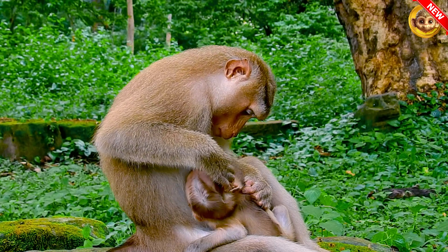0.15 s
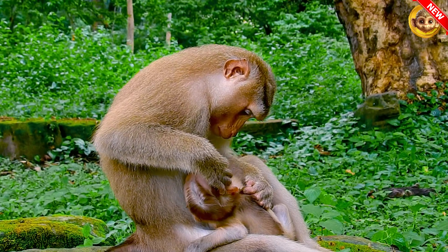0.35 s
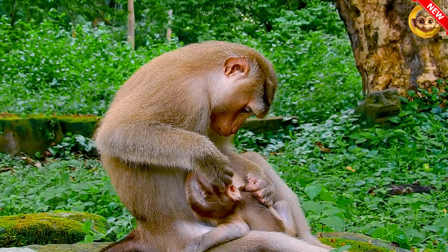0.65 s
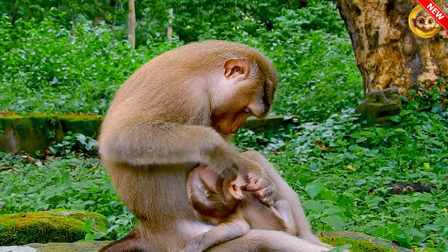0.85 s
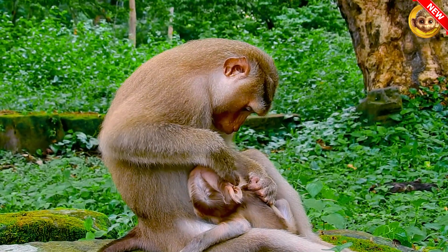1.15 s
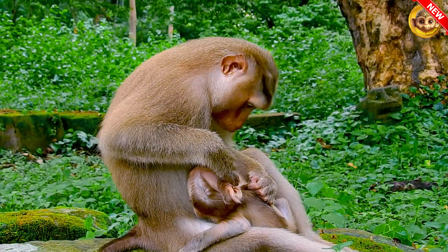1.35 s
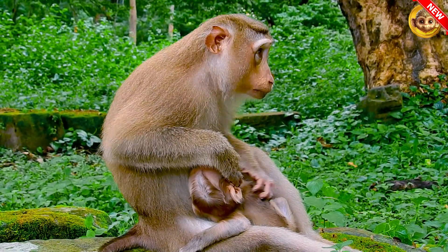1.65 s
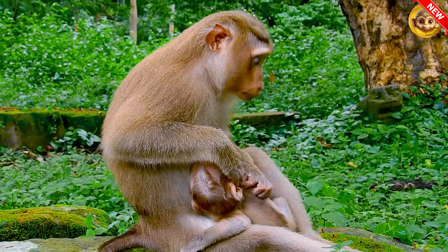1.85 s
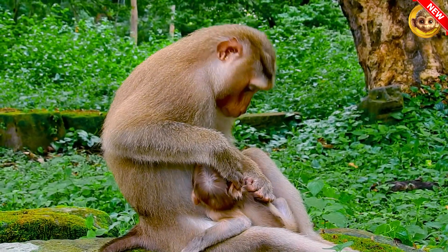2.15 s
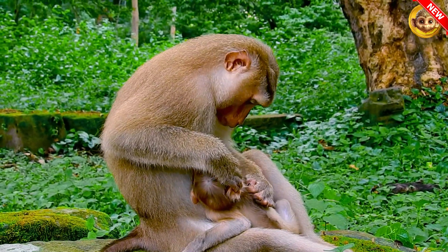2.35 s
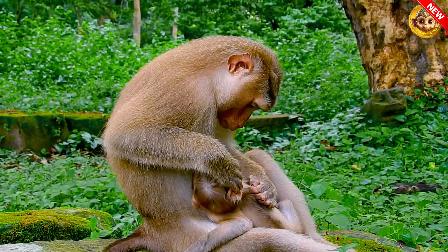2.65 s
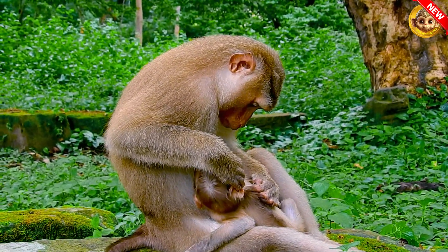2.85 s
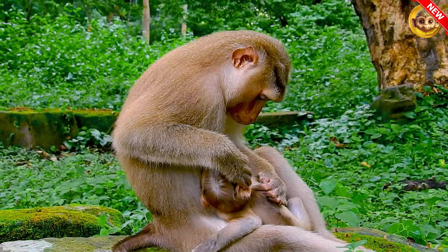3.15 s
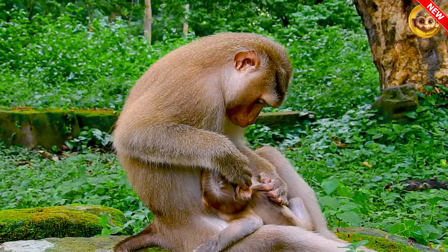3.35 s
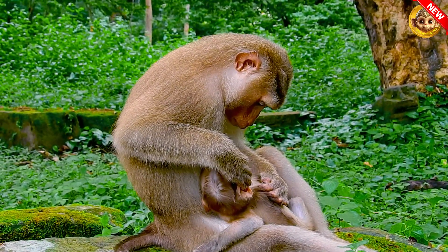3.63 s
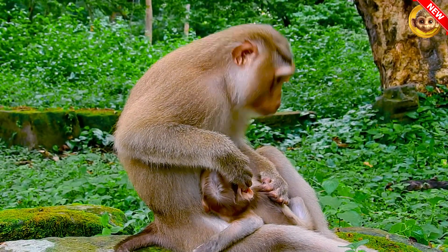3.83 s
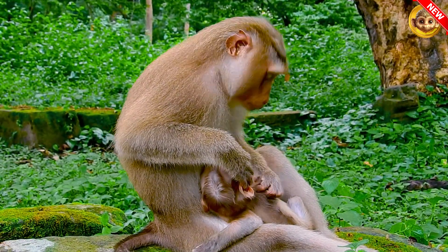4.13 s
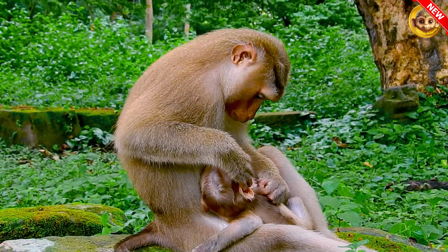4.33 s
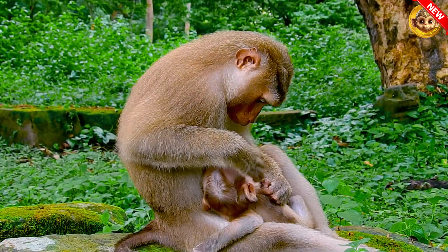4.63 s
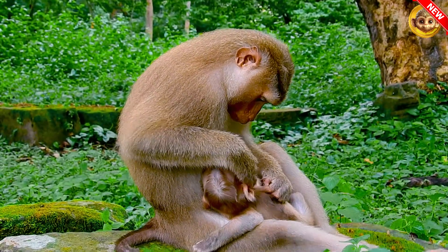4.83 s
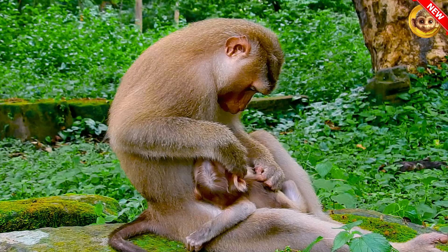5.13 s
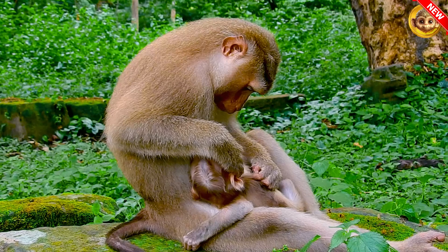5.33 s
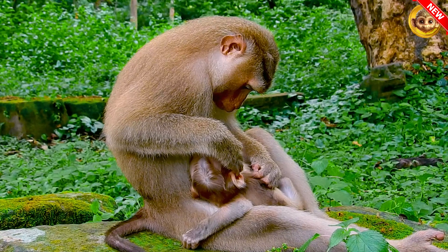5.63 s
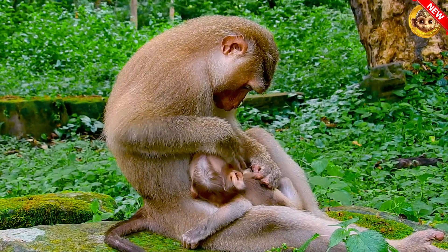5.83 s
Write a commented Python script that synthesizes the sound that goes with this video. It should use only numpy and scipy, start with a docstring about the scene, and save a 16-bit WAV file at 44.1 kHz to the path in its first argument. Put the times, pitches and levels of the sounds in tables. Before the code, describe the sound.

A quiet forest bed runs throughout: a far low hum, easing slightly after 3 s, soft leaf hiss and two faint, wavering high insect bands. At 0 s the end of a hooked bird chirp echoes away, with soft dull thuds until about 0.9 s. A faint scrape comes at 1.2 s, a weak peep at 1.6 s and a rustle at 1.7 s. A clear chirp jumps up and slides down at 1.95 s, with a small knock at 2.1 s. Hoarse, layered bird calls follow at 2.4 and 3.2 s, the second stronger, around sharp ticks and a scrape at 3.0 s and a thin squeak. Rustles come at 3.6 and 3.8 s, a faint squeak and long high whistle near 4 s. Pure whistles fall fast at 4.45 and 5.45 s, a fainter one at 5.16 s, while another long whistle slides down from 4.8 to 5.8 s. A faint squeak precedes a duller chirp at 5.8 s. Tree echoes blur the birds.

```python
"""Over a far low hum, leaf hiss and two insect bands, the end of a hooked bird chirp is followed by soft thuds.
A scrape, a peep, a second hooked chirp and ticks lead to hoarse double calls, then squeaks and falling whistles.
Sliding whistles, long and short, run on among more small ground noises, until a last, duller hooked chirp.
Bird notes are sine partials on a gliding pitch, smeared by noise echoes from the trees; the rest is
mostly shaped noise, with ringing sines for the ticks."""
import sys
import numpy as np
from scipy import signal
from scipy.fft import rfft, irfft
from scipy.io import wavfile
from scipy.ndimage import uniform_filter1d

SR = 44100
rng = np.random.default_rng(int(sys.argv[2]) if len(sys.argv) > 2 else 0)


def nominal_scale(level):
    """Amplitude ratio for a level in decibels (scalar or array-like)."""
    x = np.asarray(level, float) / 20
    return 10 ** x


def transcribe(signal):
    """Save signal, clipped to [-1, 1], as a 16-bit WAV file at the path in sys.argv[1]."""
    frames = np.atleast_2d(signal).T
    limited = np.clip(frames, -1, 1)
    pcm = np.round(limited * 32767).astype(np.int16)
    wavfile.write(sys.argv[1], SR, pcm)


N = 263718  # samples in the scene
LEAD = SR // 4  # samples of run-up, for a note already sounding at the start
TAIL = 40960  # samples in an echo


def read(table, hz, column=1):
    """Straight lines on a log-frequency axis."""
    table = np.array(table)
    return np.interp(np.log(hz + 1), np.log(table[:, 0]), table[:, column])


def level(x, db):
    """Scale to an rms level."""
    return x * nominal_scale(db) / np.sqrt(np.mean(x ** 2))


def bump(hz, centre_hz, width_hz, db):
    """A bell-shaped rise or dip in dB."""
    return db * np.exp(-2 * ((hz - centre_hz) / width_hz) ** 2)


def pair(size, db_of, likeness):
    """Coloured noise at two microphones, partly alike."""
    hz = np.fft.rfftfreq(size, 1 / SR)
    alike = np.clip(read(likeness, hz), -1, 1)
    shares = np.sqrt([(1 + alike) / 2, (1 - alike) / 2])
    mid, side = rfft(rng.standard_normal((2, size))) * shares
    return irfft(np.array([mid + side, mid - side]) * nominal_scale(db_of(hz)), size)


def walk(rate):
    """Random levels held 1 / rate s and slewed twice; spread near 1."""
    k = int(SR / rate)
    steps = np.repeat(rng.standard_normal(N // k + 1), k)
    return 1.78 * uniform_filter1d(uniform_filter1d(steps, k), k)[:N]


def fine(rows, start=0, slowness=1):
    """Fill in a hand-drawn note with 96 points of time, pitch and level."""
    s, pitch, db = np.transpose(rows)
    t = np.linspace(s[0], s[-1], num=96)
    return start + slowness * t, np.interp(t, s, pitch), np.interp(t, s, db)


def short_note(start, length, from_hz, to_hz, db, attack, release, sag_db):
    """Attack, sagging hold, release, on a glide that slows down."""
    edge_db, haste = -13.5, 1.8  # level where a note starts and ends; how early the glide happens
    u = np.linspace(0, 1, num=24)
    glide = (1 - np.exp(-haste * u)) / (1 - np.exp(-haste))
    shape_db = np.interp(u, [0, attack, 1 - release, 1], [edge_db, 0, -sag_db, edge_db - sag_db])
    return start + length * u, from_hz + (to_hz - from_hz) * glide, db + shape_db


# A PERCH, below, has these columns: echo level/dB, left minus right/dB, share blurred by nearby leaves 0-1,
# breath flutter/dB, pitch warble (share of pitch), extra damping of the tail/dB per s.

# one hooked chirp shape: t/s after start (before slowing), f/Hz, level/dB
HOOK_SHAPE = [(0, 3550, -12), (.009, 4128, 1.5), (.021, 3290, 4), (.04, 2890, -2), (.07, 2635, -4.5),
              (.108, 2407, -5), (.145, 2250, -1.5), (.18, 2200, -16)]
# its calls: start t/s, level/dB, slowness, blur 0-1, overtones level/dB
HOOK_CALLS = [(-.145, -41.5, 0.99, .3, 1.5), (1.952, -42, 0.98, .08, -1.5), (5.814, -35.5, .85, .6, -4)]
# how its 2nd partial passes: f/Hz, level/dB
HOOK_OCTAVE = [(4400, -40), (4850, -25), (5250, -20), (5800, -34), (8300, -46)]
# how its 3rd partial passes: f/Hz, level/dB
HOOK_TWELFTH = [(6700, -28), (7200, -19), (7850, -18), (8700, -28), (10000, -42)]
# PERCH columns, but without the blur, which comes from the call
HOOK_PERCH = (-0.5, 0.2, 0.84, 0.0139, 3.5)


def hooked_chirps():
    """The pitch jumps up and slides down; leaf cover dulls the higher part of a blurred call."""
    leaf_shade_db = -18  # per octave of pitch, behind full leaf cover
    echo_db, pan_db, *voice = HOOK_PERCH
    for start, call_db, slowness, blur, bright_db in HOOK_CALLS:
        s, pitch, db = fine(HOOK_SHAPE, start, slowness)
        octave = read(HOOK_OCTAVE, 2 * pitch) + bright_db
        twelfth = read(HOOK_TWELFTH, 3 * pitch) + bright_db
        db = db + call_db + leaf_shade_db * blur * np.log2(pitch / 2600)
        yield s, pitch, db, [0, octave, twelfth], (echo_db, pan_db, blur, *voice)


# falling whistles: start t/s, starting f/Hz, fall/octaves per s, level/dB, lean to the high part/dB per octave
FALL_CALLS = [(3.191, 2900, 6.7, -56, 3), (4.447, 3086, 7.5, -39.5, -1.5), (5.159, 2954, 7.3, -55, 1.5),
              (5.45, 3088, 7.66, -39, 3.5)]
# loudness along the fall: pitch f/Hz, level/dB
FALL_LOUDNESS = [(850, -45), (1000, -25), (1170, -25), (1440, -16), (1720, .5), (1980, -5), (2380, -2.5),
                 (2700, -14), (3100, -27)]
# PERCH columns; echo and blur are for a near call
FALL_PERCH = (-7, -0.6, .42, 3, .0045, 9)


def falling_whistles():
    """One pure partial drops at a steady number of octaves per second."""
    near_db, end_hz = -39, 860
    echo_per_db, blur_per_db = 0.5, 0.025
    echo_db, pan_db, blur, *voice = FALL_PERCH
    for start, from_hz, octaves, call_db, lean_db in FALL_CALLS:
        t = np.linspace(0, np.log2(from_hz / end_hz) / octaves, num=96)
        pitch = from_hz * 2 ** (-octaves * t)
        # fainter calls are further off: wetter, more blurred
        far_db = max(near_db - call_db, 0)
        perch = (echo_db + echo_per_db * far_db, pan_db, blur + blur_per_db * far_db, *voice)
        db = call_db + read(FALL_LOUDNESS, pitch) + lean_db * np.log2(pitch / 1900)
        yield start + t, pitch, db, [0], perch


# arched voice of the hoarse call: t/s after start, f/Hz, level/dB
ARCH_SHAPE = [(0, 1970, -15), (.04, 2310, -11), (.075, 2880, -6), (.11, 3170, -6), (.18, 3040, -10),
              (.25, 2830, -11), (.3, 2710, -10), (.325, 2520, -6), (.343, 2270, -5), (.355, 2140, -17)]
# its calls: start t/s, level/dB, late entry t/s, brightness/dB per octave, swell/dB per s
ARCH_CALLS = [(2.412, -58, .003, -8, -16), (3.195, -50, 0.053, 2, 14)]
# how its throat passes every partial: f/Hz, level/dB
ARCH_THROAT = [(1900, -45), (2700, -24), (3050, -3), (3300, -8), (4000, 4), (5500, 0), (6400, -3),
               (7000, -26), (8300, -23.5), (9200, -18), (10000, -24)]
# PERCH columns
ARCH_PERCH = (0, 0, .8, 3, .013, 12)


def arched_calls():
    """A hoarse arch of three partials, heard mostly on its octave because of the throat."""
    entry_db_per_s = 902  # how steeply a late entry rises
    for start, arch_db, entry, bright_db, swell_db in ARCH_CALLS:
        s, pitch, db = fine(ARCH_SHAPE, start)
        db = db + arch_db + swell_db * (s - start)
        db = db - entry_db_per_s * np.maximum(start + entry - s, 0)
        partials = [read(ARCH_THROAT, k * pitch) + bright_db * np.log2(k * pitch / 5000) for k in range(1, 4)]
        yield s, pitch, db, partials, ARCH_PERCH


# warbling voice of the hoarse call: t/s after start, f/Hz, level/dB
WARBLE_SHAPE = [(.06, 2900, -22), (.078, 3010, -8), (.105, 3220, -3), (.122, 3900, -4), (.155, 3500, -5),
                (.19, 3120, -7), (.215, 3600, -12), (.24, 3950, -10), (.29, 3700, -13), (.335, 3300, -12),
                (.37, 3000, -19), (.41, 3300, -29)]
# its calls: start t/s, level/dB, swell/dB per s
WARBLE_CALLS = [(2.412, -52.5, 10.5), (3.195, -40, -29)]
# how its throat passes the overtones: f/Hz, level/dB
WARBLE_THROAT = [(6000, -8), (6500, -22), (7000, -21.5), (7800, -25), (9500, -31), (11500, -43)]
# PERCH columns
WARBLE_PERCH = (0, 0, .9, 3.8, .021, 11)


def warbling_calls():
    """A hoarse up-and-down voice; its 2nd and 3rd partial sound as far as the throat passes them."""
    for start, warble_db, swell_db in WARBLE_CALLS:
        s, pitch, db = fine(WARBLE_SHAPE, start)
        partials = [0, read(WARBLE_THROAT, 2 * pitch), read(WARBLE_THROAT, 3 * pitch)]
        yield s, pitch, db + warble_db + swell_db * (s - start), partials, WARBLE_PERCH


# sliding whistles, long and short, one list each (a short fall, two long whistles, a short peep):
# t/s, f/Hz, level/dB
WHISTLES = [
    [(3.43, 2500, -87), (3.47, 2085, -64), (3.52, 1700, -61.5), (3.56, 1264, -58.5), (3.6, 948, -77.5),
     (3.63, 700, -60.5), (3.655, 615, -78)],
    [(3.82, 5520, -90), (3.875, 4930, -78), (3.93, 4660, -70), (4.0, 4458, -58), (4.08, 4568, -48.5),
     (4.15, 4638, -58.5), (4.25, 4700, -71), (4.4, 4620, -73), (4.8, 4660, -92.5)],
    [(4.8, 5490, -71.5), (4.85, 5520, -68.5), (4.92, 5040, -60.5), (4.98, 4380, -59.5), (5.05, 4075, -73.5),
     (5.11, 3928, -46), (5.18, 3916, -42), (5.33, 3583, -44), (5.42, 3428, -53), (5.52, 3373, -49),
     (5.6, 3370, -44), (5.66, 3273, -41.5), (5.72, 3100, -60.5), (5.83, 3070, -72)],
    [(3.18, 3530, -58), (3.2, 4100, -66.5), (3.26, 4220, -72), (3.29, 4190, -73)],
]
# how the 2nd partial passes: f/Hz, level/dB
WHISTLE_THROAT = [(1200, -28), (3500, -19), (6200, -8.5), (6500, -36), (6800, -24), (7300, -16.5),
                  (7850, -34), (8500, -41), (8850, -21), (9100, -20), (9300, -10), (9500, -35),
                  (10000, -39)]
# one row per whistle: PERCH columns
WHISTLE_PERCHES = [(-5, 0.89, .3, 1.7, .005, 1.1), (-1.5, 0.12, 0.66, 2.15, 0.0035, 5.4),
                   (-3, 0, 0.41, 2.16, 0.00398, 2.1), (3, 0, 0.48, 1.1, 0.0089, 9)]


def sliding_whistles():
    """Sliding notes with a 2nd partial that the throat lets through at some pitches."""
    for rows, perch in zip(WHISTLES, WHISTLE_PERCHES):
        s, pitch, db = fine(rows)
        yield s, pitch, db, [0, read(WHISTLE_THROAT, 2 * pitch)], perch


# short peeps: start t/s, length t/s, from f/Hz, to f/Hz, level/dB
PEEPS = [(1.609, 0.093, 1970, 1920, -68.5), (3.034, .04, 2190, 2750, -59.5),
         (3.99, 0.17, 2340, 2545, -69.5)]
# attack share, release share, sag/dB
PEEP_RULE = (0.22, 0.22, 5)
# PERCH columns
PEEP_PERCH = (-12, .8, .25, 3.5, .0035, 19)


def peeps():
    """Short pure notes with a small glide."""
    for row in PEEPS:
        yield (*short_note(*row, *PEEP_RULE), [0], PEEP_PERCH)


# thin nasal squeaks: start t/s, length t/s, from f/Hz, to f/Hz, level/dB (before the partials' levels)
SQUEAKS = [(3.054, .155, 943, 860, -67), (3.95, .17, 1010, 1131, -66.5), (5.679, .18, 1063, 1110, -69.5)]
# one row per squeak: level/dB of partials 1 to 7
SQUEAK_PARTIALS = [(-14, -6, -2.5, -4.5, -18, -17, -21), (-3.5, -6, -16, -6, -13, -24, -25),
                   (2.5, 2, -18, -28, -19, -20, -30)]
# attack share, release share, sag/dB
SQUEAK_RULE = (0.16, 0.1, 3.5)
# PERCH columns
SQUEAK_PERCH = (-10, 1.1, .3, 2.5, .0035, 20.5)


def squeaks():
    """A small animal's nasal notes: seven partials of uneven strength."""
    for row, partials in zip(SQUEAKS, SQUEAK_PARTIALS):
        yield (*short_note(*row, *SQUEAK_RULE), partials, SQUEAK_PERCH)


def notes():
    """Every note as (t/s, f/Hz, level/dB, partials/dB, perch)."""
    for source in (hooked_chirps, falling_whistles, arched_calls, warbling_calls, sliding_whistles, peeps, squeaks):
        yield from source()


def whistle(s, pitch, partial_db, flutter_db, warble):
    """Partials on one gliding pitch; the breath flutters and a fast pitch warble makes hoarse notes broad."""
    t = np.arange(s[0], s[-1], 1 / SR)

    def smooth(curve):
        return uniform_filter1d(np.interp(t, s, curve), SR // 200, mode="nearest")

    wobbling_hz = smooth(pitch) * (1 + warble * walk(350)[:len(t)])
    phase = 2 * np.pi * np.cumsum(wobbling_hz) / SR
    tone = sum(nominal_scale(smooth(db)) * np.sin((k + 1) * phase) for k, db in enumerate(partial_db))
    fade = np.minimum(1, np.minimum(t - s[0], s[-1] - t) / 0.0045)
    return np.sqrt(2) * tone * fade * nominal_scale(flutter_db * walk(150.3)[:len(t)])


def voices(paths):
    """Bird notes and squeaks, taking turns on the ways through the trees."""
    out = np.zeros((2, LEAD + N))
    for k, (s, pitch, db, partials, perch) in enumerate(notes()):
        echo_db, pan_db, blur, flutter_db, warble, damp_db = perch
        note = whistle(s, pitch, [db + p for p in partials], flutter_db, warble)
        add(out, s[0], note, paths[k % len(paths)], echo_db, pan_db, blur, damp_db)
    return out[:, LEAD:]


# left-right likeness of scattered sound: f/Hz, likeness
ECHO_LIKENESS = [(1000, 0.94), (2500, 0.81), (4000, 0.81), (6000, 0.51), (9000, 0.01)]
# echo bands: f/Hz, level/dB, t60/s (before any further damping)
ECHO_BANDS = [(700, -4, 0.25), (1200, -5, 0.29), (1830, 5, 0.95), (2300, 2, 1.5), (2900, 1.5, 1.25),
              (3700, 0.5, 1.07), (5000, 5.5, 0.7), (7600, 8.5, 0.82), (9870, -1, 0.42)]


def trees():
    """Scatter off trunks and leaves: noise that builds quickly and dies band by band."""
    rise_s = 0.012
    t = np.arange(TAIL) / SR
    noise = rfft(pair(TAIL, np.zeros_like, ECHO_LIKENESS))
    hz = np.fft.rfftfreq(TAIL, 1 / SR)
    centres = np.log(np.array(ECHO_BANDS)[:, 0])
    out = 0
    for k, (_, db, t60) in enumerate(ECHO_BANDS):
        # each band crossfades into its neighbours
        share = np.interp(np.log(hz + 1), centres, np.arange(len(ECHO_BANDS)) == k)
        shape = (1 - np.exp(-t / rise_s)) * np.exp(-np.log(1000) * t / t60)
        out = out + nominal_scale(db) * irfft(noise * share, TAIL) * shape / np.sqrt(np.sum(shape ** 2))
    # trunks stand in clumps, and the far ones are hidden by undergrowth
    return out * nominal_scale(1.6 * walk(26.0)[:TAIL] - 8.4 * (t / 0.72) ** 2)


def add(out, start, sound, path, echo_db, pan_db, blur, damp_db):
    """Place a sound: straight, blurred by the leaves next to it, and scattered by the trees."""
    leaf_t60_s = 0.14
    t = np.arange(TAIL) / SR
    leaves = pair(TAIL, np.zeros_like, ECHO_LIKENESS) * np.exp(-np.log(1000) * t / leaf_t60_s)
    leaves = leaves / np.sqrt(np.mean(np.sum(leaves ** 2, axis=1)))
    path = nominal_scale(echo_db - damp_db * t) * path + blur * leaves
    path[:, 0] += 1 - blur  # the straight sound
    heard = signal.fftconvolve(sound[None], path, axes=1)
    heard = heard * nominal_scale(np.array([[pan_db], [-pan_db]]) / 2)
    i = LEAD + int(start * SR)
    out[:, i:i + heard.shape[1]] += heard[:, :out.shape[1] - i]


# colour of stirred leaves: f/Hz, level/dB
RUSTLE_COLOUR = [(1200, -10.5), (2000, -12), (3500, -6.5), (4300, -6.5), (5500, -2), (7500, -4),
                 (10000, -20), (13000, -32)]


def leaf_noise():
    """Steady noise in the colour of stirred leaves, at rms 1."""
    return level(pair(N, lambda hz: read(RUSTLE_COLOUR, hz), ECHO_LIKENESS), 0)


def band(spectrum, centre_hz, width_hz):
    """Noise in one resonant band at rms 1; the width is between the points 6 dB down."""
    hz = np.fft.rfftfreq(N, 1 / SR)
    return level(irfft(spectrum / (1 + ((hz - centre_hz) / (width_hz / 2)) ** 2), N), 0)


def swell(s, db, length):
    """A bell-shaped burst, about 17 dB down at one length before and after its peak."""
    return nominal_scale(db) * np.exp(-2 * ((np.arange(N) / SR - s) / length) ** 2)


# soft thuds: peak t/s, level/dB, length t/s, upper modes level/dB
THUDS = [(0.016, -65.5, 0.044, -17), (.114, -61, 0.057, -13.5), (.17, -67, 0.038, -14),
         (.463, -65, 0.058, -9), (0.858, -64.5, 0.043, -6)]
# the body they sound in: f/Hz, width f/Hz, level/dB
THUD_BODY = [(718, 260, 0.16), (1150, 250, -0.18), (2150, 390, -1.5)]


def thuds():
    """Dull bursts in a low and two upper resonant bands, with the leaves they stir."""
    spectrum = rfft(rng.standard_normal(N))
    low, *upper = [nominal_scale(db) * band(spectrum, centre, width) for centre, width, db in THUD_BODY]
    leaves = nominal_scale(-6) * leaf_noise()
    return sum(swell(s, db, length) * (low + nominal_scale(upper_db) * sum(upper) + leaves)
               for s, db, length, upper_db in THUDS)


# leaf rustles: peak t/s, level/dB, length t/s
RUSTLES = [(1.702, -67.5, 0.13), (2.358, -66.5, 0.043), (3.022, -65, .022), (3.575, -58.5, 0.027),
           (3.775, -63, .08), (4.071, -69, 0.02)]


def rustles():
    """Leaf noise let through in short swells."""
    return leaf_noise() * sum(swell(*row) for row in RUSTLES)


# scrapes: peak t/s, level/dB, f/Hz, width f/Hz, length t/s
SCRAPES = [(1.214, -70.5, 5600, 700, 0.073), (3.011, -55.5, 1420, 1200, 0.023),
           (4.071, -66.5, 1504, 1500, 0.023)]


def scrapes():
    """Short swells of noise, each in one resonant band."""
    spectrum = rfft(rng.standard_normal(N))
    return sum(band(spectrum, centre, width) * swell(s, db, length) for s, db, centre, width, length in SCRAPES)


# small knocks and ticks: t/s, level/dB, ring f/Hz, t60/s
TICKS = [(2.117, -43, 967, 0.033), (2.135, -56, 866, 0.1), (2.918, -58, 10600, 0.007),
         (2.996, -33.5, 1660, 0.0054), (3.006, -44, 3480, 0.041), (3.0118, -37.5, 1480, 0.009),
         (3.017, -49, 5450, .005), (5.147, -58, 3530, 0.018)]


def ticks(path):
    """Sines that start quickly and ring out, echoed a little by the trees."""
    out, knocks = np.zeros((2, LEAD + N)), np.zeros(N)
    t = np.arange(SR // 8) / SR
    for s, db, ring_hz, t60 in TICKS:
        onset = 1 - np.exp(-t * ring_hz / 0.5)
        decay = np.exp(-np.log(1000) * t / t60)
        i = int(s * SR)
        knocks[i:i + len(t)] += nominal_scale(db) * np.sin(2 * np.pi * ring_hz * t) * decay * onset
    add(out, 0, knocks, path, echo_db=-12, pan_db=1.2, blur=0.15, damp_db=60)
    return out[:, LEAD:]


def ground(path):
    """Small movements on leaves and stone nearby."""
    return thuds() + rustles() + scrapes() + ticks(path)


# left-right likeness of leaf hiss and insects: f/Hz, likeness
AIR_LIKENESS = [(60, 0.89), (130, 0.89), (280, 0.42), (610, 0.57), (1310, 0.67), (2830, 0.48), (6120, 0.31),
                (13200, -0.5)]
# insect bands: f/Hz, width f/Hz (between points 6 dB down), level/dB (before wavering)
INSECTS = [(5480, 710, -77), (7770, 410, -78.5)]


def insects():
    """Two noise bands whose levels waver slowly and quickly."""
    out = 0
    for centre_hz, width_hz, db in INSECTS:
        hiss = pair(N, lambda hz: -6 * ((hz - centre_hz) / (width_hz / 2)) ** 2, AIR_LIKENESS)
        out = out + level(hiss, db) * nominal_scale(1.3 * walk(6.08) + 1.3 * walk(30))
    return out


# colour of leaves and insects together: f/Hz, level/dB per Hz (relative)
AIR_COLOUR = [(180, -41), (300, -2), (358, -4), (689, -6), (783, -6), (1390, -7), (2600, -10.5),
              (2860, -10), (3690, -11), (5590, -7), (6460, -9), (7580, -3.5), (9480, -17), (12400, -15),
              (13700, -30)]


def leaf_hiss():
    """Broad noise of leaves and insects, drifting slightly in level."""
    air = level(pair(N, lambda hz: read(AIR_COLOUR, hz), AIR_LIKENESS), -70)
    return air * nominal_scale(0.78 * walk(3.535))


# colour of the hum: f/Hz, level/dB per Hz (relative)
HUM_COLOUR = [(13, -57), (22, -31), (38, -16), (59, -5), (76, -3), (129, 2), (198, -6), (224, -11.5),
              (269, -17.5), (305, -33.5), (330, -41.5), (430, -51), (730, -120)]
# a stronger tone in it: f/Hz, width f/Hz, level/dB over the hum
HUM_TONE = (84.4, 10.4, 6.2)
# slow level changes: t/s, level/dB
HUM_SWELL = [(0, 0.4), (1.5, 0.9), (3, 0.35), (4.5, -2.5), (5.98, -1.5)]


def far_hum():
    """Low noise with a stronger narrow band, lower in level towards the end than at the start."""
    likeness = [(30, 1.0), (200, 0.86)]
    hum = level(pair(N, lambda hz: read(HUM_COLOUR, hz) + bump(hz, *HUM_TONE), likeness), -59.5)
    s, swell_db = np.transpose(HUM_SWELL)
    return hum * nominal_scale(np.interp(np.arange(N) / SR, s, swell_db))


def scene():
    """All sources; each note reaches the ear by one of six ways through the trees."""
    paths = [trees() for _ in range(6)]
    return voices(paths) + ground(paths[0]) + insects() + leaf_hiss() + far_hum()


def band_limit(x):
    """A steep low-pass at the top of the band."""
    return signal.sosfilt(signal.butter(12, 13840, fs=SR, output="sos"), x)


# dip from the microphone housing: f/Hz, width f/Hz, level/dB
MIC_DIP = (4540, 267, -4)
# colour difference of the microphones: f/Hz, left minus right level/dB
MIC_LEAN = [(60, -4.5), (110, -2.5), (200, 0.5), (360, 3.5), (660, 3.5), (1200, 3.5), (2190, 2.5),
            (3990, 0.5), (7270, -0.5), (13200, 2)]


def record(dry):
    """The housing dips one band and the two microphones differ in colour."""
    hz = np.fft.rfftfreq(N, 1 / SR)
    colour_db = bump(hz, *MIC_DIP) + read(MIC_LEAN, hz) * np.array([[.5], [-.5]])
    mix = irfft(rfft(dry) * nominal_scale(colour_db), N)
    return band_limit(mix)


dry = scene()
out = record(dry)
transcribe(out)
```